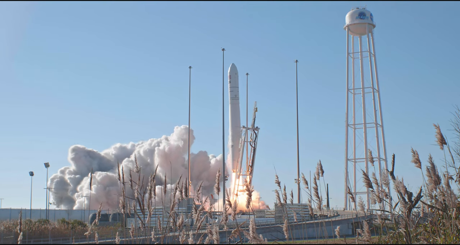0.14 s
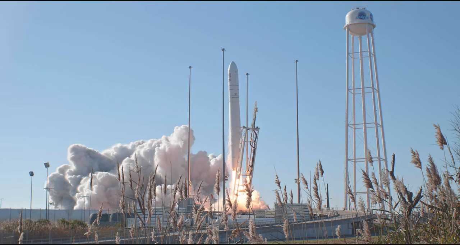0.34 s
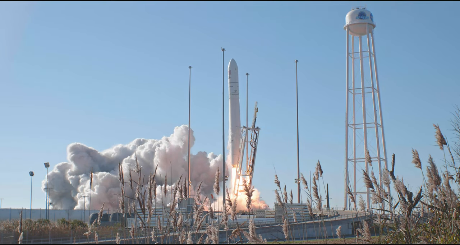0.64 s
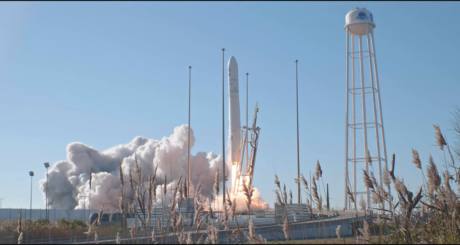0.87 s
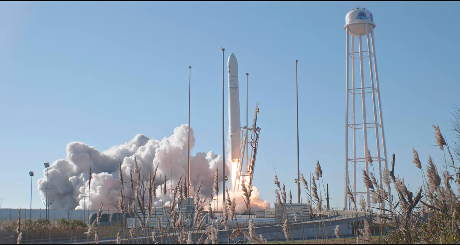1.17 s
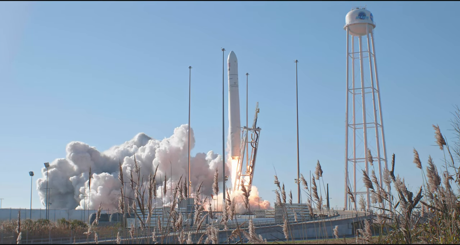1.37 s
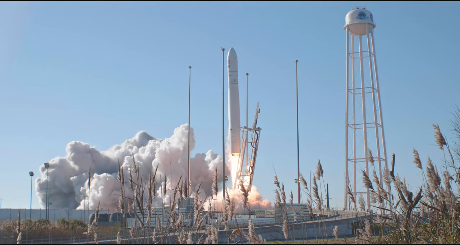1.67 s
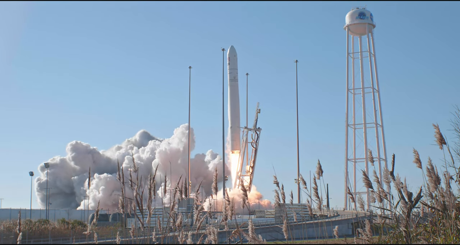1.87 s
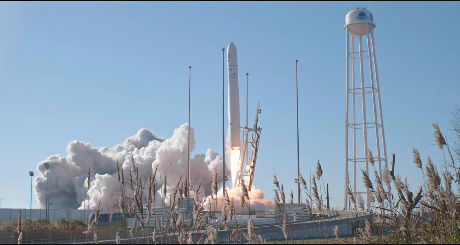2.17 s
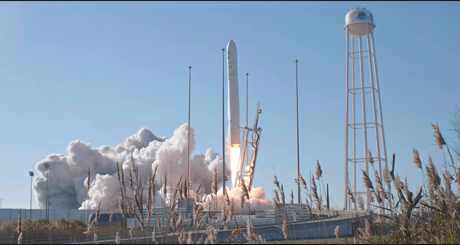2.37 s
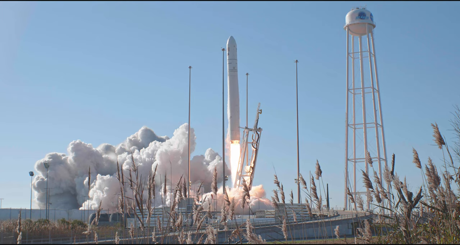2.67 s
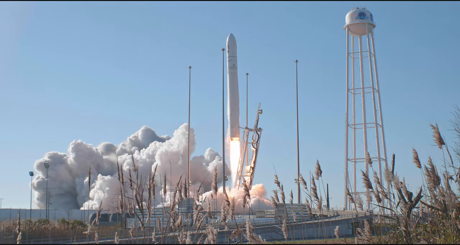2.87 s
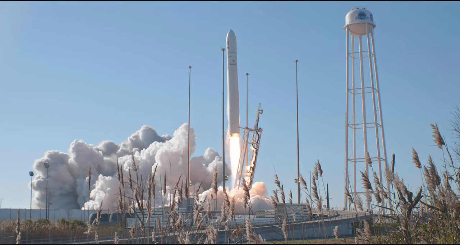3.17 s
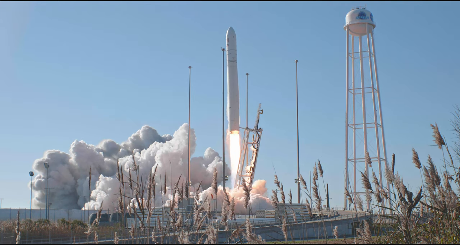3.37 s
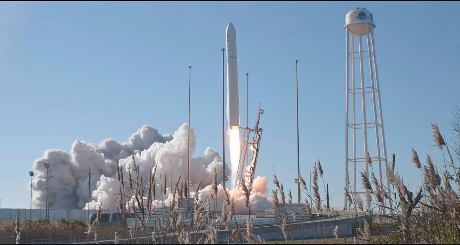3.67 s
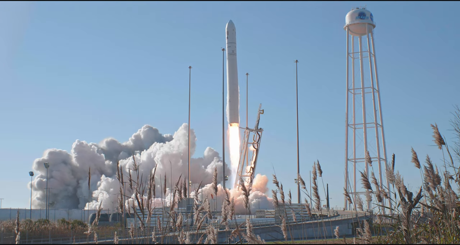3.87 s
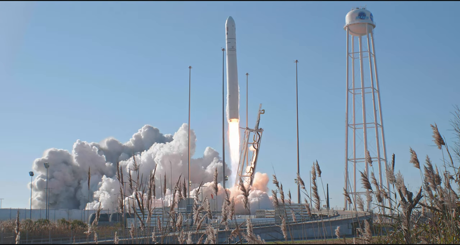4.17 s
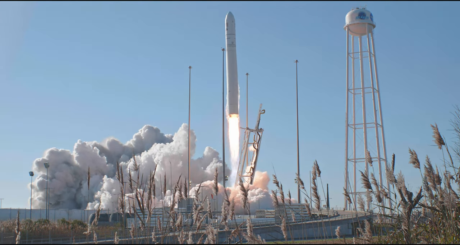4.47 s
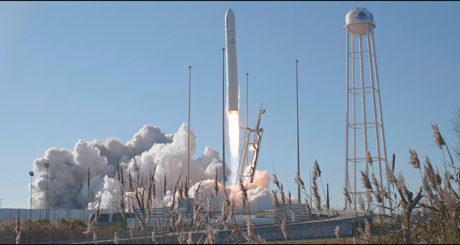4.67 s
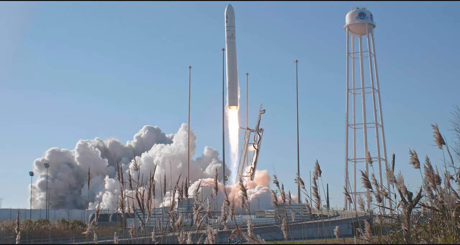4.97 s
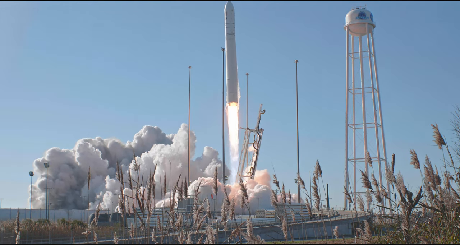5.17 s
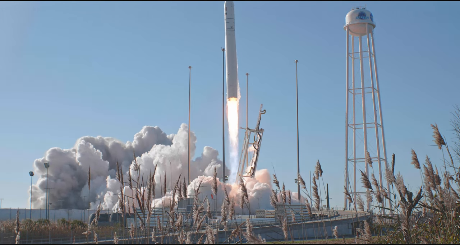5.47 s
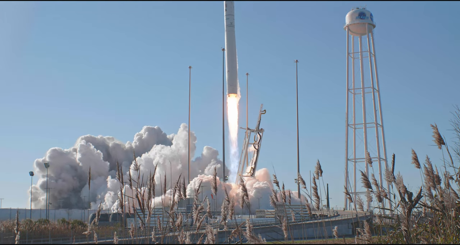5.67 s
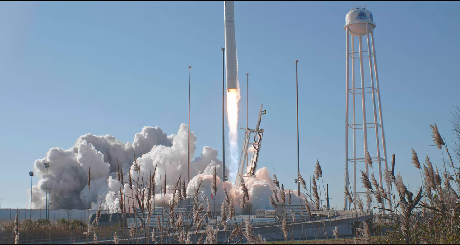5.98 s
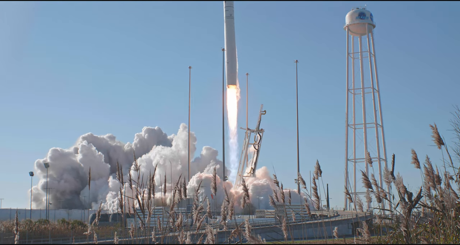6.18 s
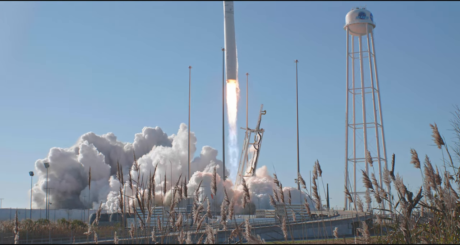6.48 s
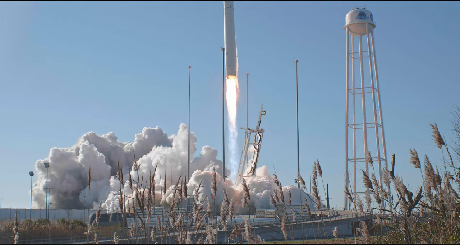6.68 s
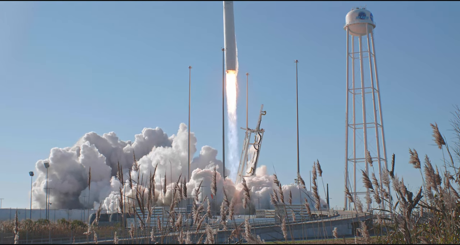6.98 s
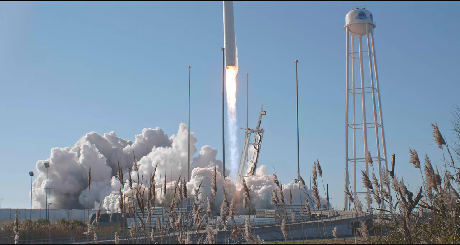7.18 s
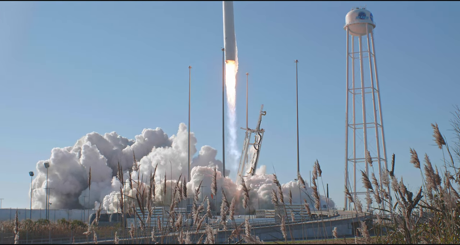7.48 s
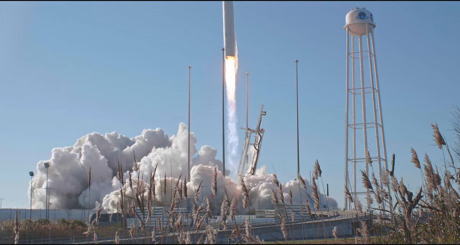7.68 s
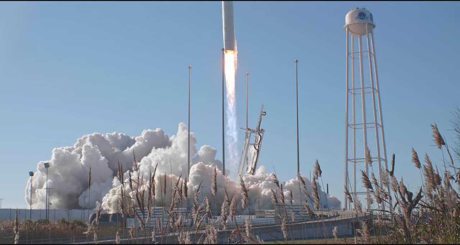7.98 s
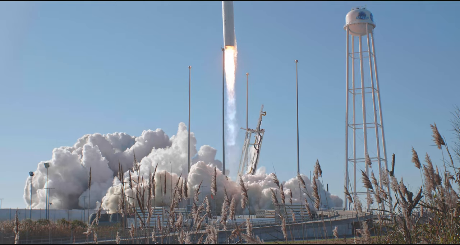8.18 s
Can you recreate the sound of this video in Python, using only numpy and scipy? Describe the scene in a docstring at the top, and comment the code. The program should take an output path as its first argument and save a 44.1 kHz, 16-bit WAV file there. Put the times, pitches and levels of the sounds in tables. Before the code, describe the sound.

Heavy low rocket-engine thunder, overdriven at the microphone, breaks into dense sharp crackles, eases midway, then surges with snapping shocks and fizz.

```python
"""A rocket climbs off its pad, heard from the reeds close by.
First the flame trench drones and fire rushes over the pad; both die away as the rocket lifts.
As the plume leaves the pad, turbulence roars, a band howls upward and steep waves break into crackling shocks.
After a lull the plume surges above the smoke: the crackle returns harder, bright fizz flares, the rumble thins.
Throughout, a ground echo hollows the roar; wherever the low band is too loud, the recorder flattens it."""
import sys
import numpy as np
from scipy import signal
from scipy.fft import rfft, irfft, next_fast_len
from scipy.io import wavfile
from scipy.ndimage import uniform_filter1d, map_coordinates

SR = 44100
rng = np.random.default_rng(int(sys.argv[2]) if len(sys.argv) > 2 else 0)


def log_audio(samples):
    """Write samples as a 16-bit WAV file to the path given in sys.argv[1]."""
    # one column per channel
    frames = np.atleast_2d(samples).T
    # limit to full scale, then quantise
    limited = np.clip(frames, -1, 1)
    pcm = np.round(limited * 32767).astype(np.int16)
    wavfile.write(sys.argv[1], SR, pcm)


N = 367353

# force of the exhaust noise at the reeds; surges off the pad and again above the smoke: t/s, level/dB
EXHAUST_FORCE = [(0, -39.5), (.8, -45), (1.6, -45.5), (2.05, -42), (2.8, -41.5), (3.35, -46), (4.4, -48.5),
                 (5, -46.5), (5.4, -46), (5.75, -47.5), (6.05, -46), (6.35, -41), (7.45, -39),
                 (7.95, -37.5), (8.33, -39)]
USUAL_FORCE_DB = -44
# the plume: t/s, pitch of the roar/ratio, share of the shocks that arrives unscattered/0-1
PLUME_COURSE = [(0, 0.95, 0.3), (.7, 0.95, 0.1), (1.5, 0.95, .42), (2.3, 1.158, 0.8), (3.0, 1.174, 0.5),
                (3.6, 1.037, .5), (4.6, 0.88, 0.5), (6.1, 1.098, .25), (8.33, 1.132, 0.2)]

# colours of the turbulence, from the largest eddies to the finest: f/Hz, relative level/dB
RUMBLE_COLOUR = [(10, -32), (22, -11), (33, -0.5), (45, 4), (55, -2.5), (70, -21), (150, -49)]
BOOM_COLOUR = [(30, -32), (48, -3.5), (62, -1.5), (85, -3), (105, -2.5), (135, -11), (200, -30),
               (400, -54.5)]
ROAR_COLOUR = [(60, -16.5), (110, 0), (170, 2), (260, -5.5), (380, -10), (600, -21), (1500, -58)]
TEARING_COLOUR = [(200, -11), (400, 0), (650, -1.5), (1000, -11), (1600, -22), (2500, -31.5), (4000, -49),
                  (8000, -71)]
HISS_COLOUR = [(1500, -17), (3000, 3), (4000, 2.5), (6000, -7), (9000, -13.5), (12000, -16.5),
               (16000, -24.5)]
# stereo width of the turbulence, howl, hiss, fizz and pad noises: f/Hz, side relative to mid/dB
STEREO_WIDTH = [(30, -27.5), (70, -23.5), (130, -21), (260, -16), (500, -10), (1000, -9.5), (2000, -11.5),
                (4000, -1), (8000, 5), (12000, -0.5)]
# the deep sound; at the end the rumble thins and the boom sits higher:
# t/s, rumble level/dB, boom level/dB, boom pitch/ratio, roar level at the usual force/dB
BASS_COURSE = [(0, -23, -9, 1.024, -17), (1.7, -14.5, -13.5, 1.123, -14.5),
               (2.3, -15.5, -11.5, 1.093, -16.5), (3.7, -19.5, -13, 1.018, -15.5),
               (4.6, -16.5, -14.5, 1.086, -15.5), (5.4, -17, -13.5, 0.94, -15.5),
               (6.1, -17, -12, 0.99, -14.5), (6.7, -17.5, -11, 1.15, -15.5), (7.7, -24, -13, 1.36, -15),
               (8.33, -26.5, -16, 1.33, -14)]
# the tearing sharpens as the bare plume comes into the open: t/s, pitch/ratio, extra level/dB
TEARING_OPENING = [(0, 0.97, -0.24), (2.3, .97, -1), (3.1, 0.97, -1), (4.5, 1.036, 1), (5.6, 1.1, 1.4),
                   (6.5, 1.12, 1.8), (8.33, 1.137, -0.8)]
# ground echo, late by half a cycle of the hollow: t/s, nominal hollow f/Hz, echo strength/0-1
GROUND_HOLLOW = [(0, 112.6, .25), (.8, 121.3, .3), (2.0, 140, .3), (3.0, 160, .36), (3.9, 134.8, .33),
                 (4.5, 140, .25), (5.2, 144.7, .22), (6.0, 128.8, .34), (7.1, 85.8, .18), (8.33, 60.1, .1)]
# a band stands out of the roar, climbs as the plume leaves the pad and sinks back:
# t/s, centre f/Hz, level/dB
HOWL_COURSE = [(0, 169.7, -33.5), (1.2, 215.6, -35), (2.3, 265.1, -26), (3.0, 305, -21),
               (3.5, 244.9, -22.5), (4.15, 224.8, -23), (4.8, 250.1, -33), (5.4, 250, -34.5),
               (6.0, 200.3, -22.5), (6.5, 250.3, -24.5), (7.2, 250.1, -21.5), (7.7, 224.8, -26),
               (8.33, 180, -20)]
# shape of that band at its nominal centre: f/Hz, relative level/dB
HOWL_SHAPE = [(150, -36), (205, -10.5), (235, 0), (265, -0.5), (295, -10), (380, -36)]
HOWL_CENTRE_HZ = 250

# the strongest single shocks, before gain and filtering: t/s, knock level/dB, bright edge level/dB
STRONG_SHOCKS = [(.726, -26, -44), (.787, -26, -50), (.868, -27, -51), (.945, -35, -45),
                 (0.9886, -20.5, -39), (1.036, -23, -54), (1.105, -31, -44), (1.1457, -22.5, -38),
                 (1.264, -29, -46.5), (1.3605, -22, -44), (1.415, -27, -44), (1.608, -25.5, -50),
                 (1.645, -29, -44), (1.675, -28, -43), (1.722, -29, -44), (1.731, -26, -44),
                 (1.7775, -21, -37), (1.856, -23, -47), (1.897, -22.5, -40), (2.047, -20, -48),
                 (2.2309, -18, -43), (2.302, -19, -44), (2.338, -23, -44), (2.3663, -23, -43),
                 (2.389, -19, -40), (2.4278, -20, -42), (2.4356, -19.5, -46), (2.4577, -17.5, -37),
                 (2.487, -18, -43), (2.5043, -18.5, -41), (2.554, -20, -44), (2.585, -25, -44),
                 (2.6395, -17, -40), (2.6636, -26, -43), (2.6813, -18.5, -41), (2.7206, -19, -45),
                 (2.7528, -18, -40), (2.7684, -20, -40), (2.803, -18.5, -41), (2.827, -16.5, -40),
                 (2.8804, -20.5, -49), (2.9072, -23, -39), (2.9305, -20, -40), (2.9507, -20, -38),
                 (3.0082, -20, -43), (3.0205, -20, -45), (3.0372, -23, -46), (3.0629, -24, -39),
                 (3.072, -23, -40), (3.1186, -22, -38), (3.1377, -20, -36), (3.157, -24, -47),
                 (3.1813, -24, -45), (3.2509, -24.5, -46), (3.2961, -21.5, -41), (3.3206, -23, -50),
                 (3.359, -26, -42), (3.4425, -30, -45), (3.4518, -26, -46), (3.5064, -23, -47),
                 (3.5331, -22, -41), (3.5715, -25, -44), (3.6732, -24, -46), (3.817, -26, -45),
                 (3.85, -24, -45), (3.8623, -27, -43), (3.8882, -21, -42), (4.0976, -29, -48),
                 (4.2016, -32, -48), (4.3844, -27, -47), (4.4607, -28, -43), (4.553, -27, -42),
                 (4.7465, -28, -47), (4.7906, -26, -50), (4.862, -26, -48), (4.9074, -23, -51),
                 (5.18, -25, -48), (5.1941, -26, -49), (5.2482, -27, -51), (5.2918, -28, -49),
                 (5.3384, -30, -44), (5.3417, -22, -43), (5.3929, -26, -42), (5.5092, -25, -52),
                 (5.5554, -24.5, -52), (5.8696, -23, -45), (5.9351, -21.5, -50), (5.9673, -22, -48),
                 (6.0698, -24, -45), (6.1208, -23, -45), (6.1455, -25, -43), (6.1765, -19.5, -34),
                 (6.2033, -18.5, -49), (6.2546, -21, -48), (6.325, -16, -38), (6.3414, -19, -44),
                 (6.3644, -17, -38), (6.3761, -17, -45), (6.4905, -15, -42), (6.5291, -16, -39),
                 (6.5569, -19, -47), (6.5939, -15, -33), (6.687, -23, -46), (6.7278, -23, -37),
                 (6.757, -17.5, -39), (6.8312, -27, -37), (6.8506, -14, -42), (6.8692, -18, -38),
                 (6.9187, -14, -37), (6.9575, -18.5, -49), (7.0079, -18.5, -42), (7.0489, -18, -42),
                 (7.1393, -15.5, -46), (7.2577, -20, -43), (7.282, -24, -37.5), (7.3397, -19, -42),
                 (7.4176, -15.5, -41), (7.4671, -17, -35), (7.595, -18, -33), (7.6288, -16, -33),
                 (7.6589, -15.5, -36), (7.6815, -19, -44), (7.7162, -17.5, -37), (7.768, -14.5, -34),
                 (7.8262, -19.5, -33), (7.9274, -22, -32), (7.9461, -12.5, -34), (7.9837, -13, -33),
                 (8.0034, -16, -38), (8.019, -12.5, -31), (8.081, -15.5, -41), (8.1013, -15, -44),
                 (8.1162, -16, -45), (8.159, -19, -25), (8.1769, -24, -41), (8.231, -15.5, -36),
                 (8.2465, -15.5, -35), (8.272, -26, -36), (8.2882, -15.5, -41), (8.3013, -16, -43)]
KNOCK_GAIN_DB, EDGE_GAIN_DB = 12.5, 12.5
CRACK_TAIL_DB = -11  # what the reeds scatter behind each knock
EDGE_SCATTER = .45  # scattered burst added to each edge, as a gain
# how far around them they swallow the turbulence and the weaker shocks
SWALLOW_S, SHOCK_SWALLOW_S = .0016, .003

# levels at the usual force, and dB gained per dB of force: mostly the finer the sound, the more it swings;
# the share of unscattered shocks then weighs all but the roar and the spits
ROAR_FOLLOWS = .33
TEARING_DB, TEARING_FOLLOWS = -27.5, .53
KNOCK_DB, KNOCK_FOLLOWS = -35.5, 1
SNAP_DB, RIP_DB, CRACKLE_FOLLOWS = -41, -42.5, 1.35
HISS_DB, HISS_FOLLOWS = -62, 1.7
HISS_STEADY = .12  # share of the hiss that does not flutter
SPITS_PER_S, SPIT_DB, SPIT_FOLLOWS, SPIT_SPREAD_DB = 140, -69, .83, 4.5

# bursts of bright fizz: t/s, level at the onset/dB
FIZZ_BURSTS = [(5.122, -58), (6.596, -56), (7.484, -56), (7.553, -52), (7.594, -49), (7.619, -54),
               (7.628, -56), (7.785, -49), (7.825, -47), (7.845, -51), (7.85, -51), (7.862, -46),
               (7.909, -54), (7.945, -54), (7.984, -56), (8.127, -57), (8.158, -51), (8.271, -54)]
# their colour: f/Hz, relative level/dB
FIZZ_COLOUR = [(4000, -18), (7000, -4), (10000, -1), (12500, -2), (16000, -13)]
FIZZ_DECAY_S = .0046

# resonance of the flame trench: f/Hz, relative level/dB
TRENCH_COLOUR = [(35, -27.5), (55, -7.5), (68, -5), (88, -2.5), (104, -9), (145, -35)]
# its drone while the exhaust pours through: t/s, level/dB
TRENCH_FADE = [(0, -14.5), (.6, -11), (1.6, -12), (2.2, -24), (3.2, -45)]
# colour of the flame striking the pad: f/Hz, relative level/dB
PAD_COLOUR = [(600, -8), (1200, 4), (2500, -1), (3500, -7), (5000, -17), (8000, -24.5), (11000, -29),
              (15000, -38)]
# its smooth rush: t/s, level/dB
PAD_FADE = [(0, -52), (.1, -54), (.28, -43), (.5, -50.5), (.68, -50), (1.0, -60), (1.8, -72)]

OVERLOAD = .43  # full scale = 1
CUTOFF_HZ = 16000


def eddies(force_db, pitch, direct):
    """Turbulence of four sizes, from rumble to tearing, with its echo off the ground."""
    rumble_db, boom_db, boom_pitch, roar_db = in_time(BASS_COURSE)
    rumble = from_db(rumble_db) * turbulence(RUMBLE_COLOUR)
    boom = from_db(boom_db) * evened(turbulence(BOOM_COLOUR, speed=boom_pitch))
    roar_gain = from_db(roar_db + ROAR_FOLLOWS * force_db)
    roar = roar_gain * evened(turbulence(ROAR_COLOUR, speed=pitch))
    tearing_pitch, extra_db = in_time(TEARING_OPENING)
    flicker_db = 1.7 * drift(90)
    tearing_gain = from_db(TEARING_DB + extra_db + TEARING_FOLLOWS * force_db + flicker_db)
    tearing = tearing_gain * np.sqrt(1 - direct / 2) * turbulence(TEARING_COLOUR, speed=tearing_pitch)
    return ground_echo(rumble + boom + roar + tearing, dull_hz=414)


def ground_echo(x, dull_hz):
    """The bounce off the ground comes half a cycle of the hollow late and has lost its treble."""
    hollow_hz, strength = in_time(GROUND_HOLLOW)
    n = np.arange(N)
    late = n - SR / (2 * hollow_hz)
    dulled = cut(x, dull_hz, "low", order=1)
    bounce = np.array([np.interp(late, n, side) for side in dulled])
    return x + strength * bounce


def howl():
    """One broad band of noise stands out of the roar and glides as the plume rises."""
    hz, db = in_time(HOWL_COURSE)
    return from_db(db) * evened(turbulence(HOWL_SHAPE, speed=hz / HOWL_CENTRE_HZ))


def cracks():
    """Single strong shocks: pressure dips, jumps and sags back, with a bright edge and a gritty tail."""
    knocks, edges = np.zeros((2, N))
    for s, knock_db, edge_db in STRONG_SHOCKS:
        knocks[round(s * SR)] = from_db(knock_db + KNOCK_GAIN_DB)
        edges[round(s * SR)] = from_db(edge_db + EDGE_GAIN_DB)
    jumps = cut(n_waves(knocks, sag_s=.001, dip=.35), 1350, "low")
    grit = scatter(knocks, decay_s=.005)
    tails = np.array([n_waves(side, sag_s=.00028, dip=.55) for side in grit])
    tails = cut(cut(tails, 500, "high"), 2900, "low") * from_db(CRACK_TAIL_DB)
    bright = edges + EDGE_SCATTER * scatter(edges, decay_s=.003)
    bright = cut(cut(bright, 3100, "high"), 6300, "low")
    return jumps + tails + bright


def n_waves(clicks, sag_s, dip):
    """Each click as a wave that sinks by a share of its height, jumps by the whole and sinks back."""
    t = np.arange(-SR // 200, SR // 200 + 1) / SR
    wave = (np.heaviside(t, .5) - dip) * np.exp(-np.abs(t) / sag_s)
    return signal.oaconvolve(clicks, wave, "same")


def swallowed(reach_s):
    """A strong shock overtakes the smaller waves around it: the share of them that is left."""
    t = np.arange(N) / SR
    at = np.sort(np.array(STRONG_SHOCKS)[:, 0])
    midpoints = (at[1:] + at[:-1]) / 2
    nearest = at[np.searchsorted(midpoints, t)]
    return 1 - np.exp(-((t - nearest) / reach_s) ** 2)


def steepness(pressure, smooth_hz):
    """How fast the pressure climbs, evened to rms 1."""
    return evened(np.gradient(smoothed(pressure.mean(axis=0), smooth_hz)))


def shock_train(slope, growth_db, steepest, chance_db, uneven_db):
    """Loud sound steepens: each rising flank breaks into a shock, the stronger the faster it climbs."""
    at = signal.find_peaks(slope, height=0)[0]
    luck, left, right = np.clip(rng.standard_normal((3, N))[:, at], -2, 2)
    strength_db = growth_db * np.minimum(slope[at], steepest) + chance_db * luck
    shocks = np.zeros((2, N))
    shocks[:, at] = from_db(strength_db + uneven_db * np.array([left, right]))
    return evened(shocks)


def front(clicks, sag_hz, edge_hz):
    """Turns clicks into jumps of pressure that sag back, their edge rounded by the air."""
    held = cut(clicks, sag_hz, "low", order=1)
    sagging = cut(held, sag_hz / 2, "high", order=1)
    return cut(sagging, edge_hz, "low", order=1)


def clean_shocks(slope, force_db):
    """Clean fronts snap with a knock in the middle range."""
    snaps = shock_train(slope, growth_db=10, steepest=2.0, chance_db=2.5, uneven_db=1.2)
    # weak shocks are blunt, so the knocks differ less in size than their edges do
    knocks = snaps ** .9
    knocking = rms_one(cut(front(knocks, sag_hz=380, edge_hz=730), 1300, "low"))
    snapping = rms_one(cut(front(snaps, sag_hz=510, edge_hz=1200), 4600, "low"))
    knock_gain = from_db(KNOCK_DB + KNOCK_FOLLOWS * force_db)
    snap_gain = from_db(SNAP_DB + CRACKLE_FOLLOWS * force_db)
    return knock_gain * knocking + snap_gain * snapping


def ripping(rips, force_db):
    """Scattered fronts merge into a ripping noise."""
    fronts = front(scatter(rips, decay_s=.0034), sag_hz=1020, edge_hz=2100)
    return from_db(RIP_DB + CRACKLE_FOLLOWS * force_db) * rms_one(cut(fronts, 3900, "low"))


def splash(clicks, decay_s):
    """Reeds, steelwork and smoke smear each click into a short dying swell of the same energy."""
    keep = np.exp(-2 / (decay_s * SR))
    return np.sqrt(signal.lfilter([1 - keep], [1, -keep], clicks ** 2 + 1e-18))


def scatter(clicks, decay_s):
    """Each click as a burst of noise, another on each side."""
    return splash(clicks, decay_s) * rng.standard_normal((2, N))


def spits(force_db):
    """Tiny, grainy clicks spit in the treble at random, in very uneven sizes."""
    born = rng.random(N) < SPITS_PER_S / SR
    clicks = born * from_db(SPIT_SPREAD_DB * np.minimum(rng.exponential(1, N), 3))
    grains = clicks + 1.3 * scatter(clicks, decay_s=.0015)
    grains = cut(cut(grains, 2800, "high"), 4100, "low", order=1)
    grains = cut(grains, 10000, "low", order=1)
    return from_db(SPIT_DB + SPIT_FOLLOWS * force_db) * rms_one(grains)


def fizzes():
    """Very bright bursts of noise that flare and die within milliseconds."""
    clicks = np.zeros(N)
    for s, db in FIZZ_BURSTS:
        clicks[round(s * SR)] = from_db(db)
    keep = np.exp(-1 / (FIZZ_DECAY_S * SR))
    envelope = signal.lfilter([1], [1, -keep], clicks + 1e-18)
    return envelope * turbulence(FIZZ_COLOUR)


def hiss(rips, force_db):
    """The finest spray of the shocks is a hiss that partly flutters with them."""
    flutter = rms_one(splash(rips, decay_s=.004) * from_db(2.2 * drift(44)))
    swell = rms_one(HISS_STEADY + (1 - HISS_STEADY) * flutter)
    return from_db(HISS_DB + HISS_FOLLOWS * force_db) * swell * turbulence(HISS_COLOUR)


def pad():
    """The drone of the trench and the rush of flame on concrete; both die away as the rocket lifts."""
    drone = from_db(in_time(TRENCH_FADE)[0]) * evened(turbulence(TRENCH_COLOUR))
    rush = from_db(in_time(PAD_FADE)[0] + 1.1 * drift(30)) * turbulence(PAD_COLOUR)
    return drone + rush


def turbulence(spectrum, speed=1):
    """Coloured stereo noise, alike on both sides in the bass; flow speed shifts its pitch; rms 1."""
    size = next_fast_len(N, True)
    hz = np.arange(size // 2 + 1) * SR / size
    colour = gain_at(spectrum, hz) * (hz < 2 * spectrum[-1][0])
    mid, side = rfft(rng.standard_normal((2, size))) * colour
    noise = irfft(mid + side * gain_at(STEREO_WIDTH, hz) * [[1], [-1]], size)
    place = np.cumsum(speed * np.ones(N)) % size
    return rms_one(np.array([np.interp(place, np.arange(size), channel) for channel in noise]))


def drift(rate):
    """Random wander with about this many turns a second; spread 1."""
    knots = rng.standard_normal(N // 40)
    place = np.arange(N) * min(rate / SR, 1 / 41)
    return map_coordinates(knots, [place], order=1) * np.sqrt(3 / 2)


def in_time(rows):
    """The columns of a curve, sample by sample."""
    s, *columns = np.transpose(rows)
    return [np.interp(np.arange(N) / SR, s, c) for c in columns]


def gain_at(points, hz):
    """A spectrum read on a log-frequency axis, as gain."""
    at, db = np.transpose(points)
    return from_db(np.interp(np.log(hz + 1e-3), np.log(at), db))


def from_db(db):
    """Decibels to gain."""
    return 10 ** (np.asarray(db) / 20)


def rms_one(x):
    """Scales a signal to rms 1."""
    return x / np.sqrt(np.mean(x ** 2) + 1e-20)


def evened(x):
    """Holds a signal near rms 1 over a sliding third of a second."""
    power = np.mean(np.atleast_2d(x) ** 2, axis=0)
    return x / np.sqrt(np.abs(uniform_filter1d(power, SR // 3)) + 1e-12)


def cut(x, hz, kind, order=2):
    """Causal low-pass or high-pass."""
    sos = signal.butter(order, min(hz, .45 * SR), kind, fs=SR, output="sos")
    return signal.sosfilt(sos, x + 1e-18)


def smoothed(x, hz):
    """Low-pass without delay."""
    return signal.sosfiltfilt(signal.butter(2, min(hz, .45 * SR), fs=SR, output="sos"), x)


def scene():
    """One force drives the roar and the tearing, and the shocks and hiss on their rising flanks."""
    force_db = in_time(EXHAUST_FORCE)[0] - USUAL_FORCE_DB
    pitch, direct = in_time(PLUME_COURSE)
    clean, scattered = np.sqrt(direct), np.sqrt(1 - direct)
    pressure = eddies(force_db, pitch, direct) + howl()
    slope = steepness(pressure, smooth_hz=595)
    rips = shock_train(slope, growth_db=11.0, steepest=1.8, chance_db=1, uneven_db=3.0)
    shocks = clean * clean_shocks(slope, force_db) + scattered * ripping(rips, force_db)
    spray = spits(force_db) + scattered * hiss(rips, force_db)
    body = (pressure + pad()) * swallowed(SWALLOW_S)
    return body + shocks * swallowed(SHOCK_SWALLOW_S) + spray + fizzes() + cracks()


def overload(x, knee):
    """Flattens the wave at the overload level; a higher knee number makes a sharper bend."""
    return x / (1 + np.abs(x / OVERLOAD) ** knee) ** (1 / knee)


def record(dry):
    """The heavy low band flattens at the overload while the thin treble slips past; the top is cut."""
    low = smoothed(dry, 3200)
    treble = dry - low
    mixed = smoothed(overload(low, knee=16), 4600) + treble
    top_cut = signal.ellip(10, .2, 70, CUTOFF_HZ, fs=SR, output="sos")
    fade = np.minimum(np.arange(N)[::-1] / (.003 * SR), 1)  # last 3 ms
    return fade * signal.sosfilt(top_cut, mixed)


dry = scene()
out = record(dry)
log_audio(out)
```